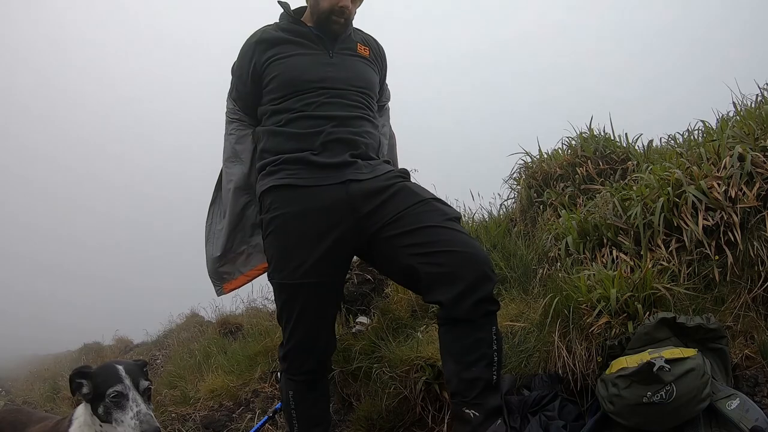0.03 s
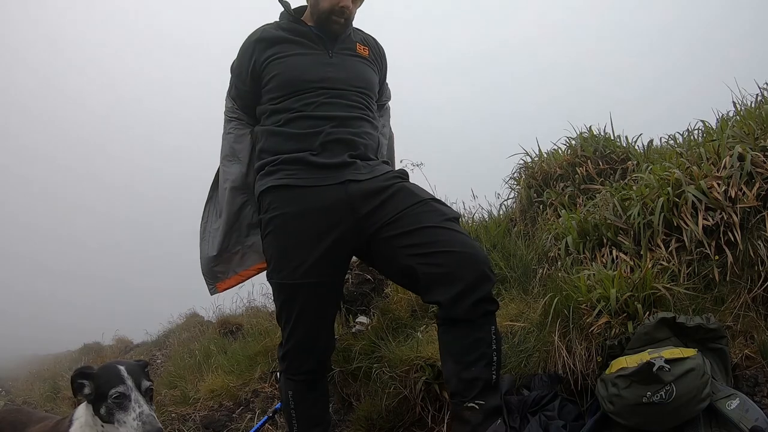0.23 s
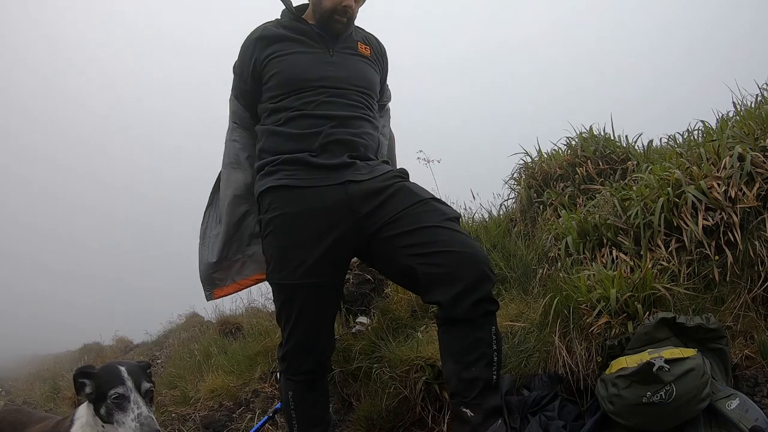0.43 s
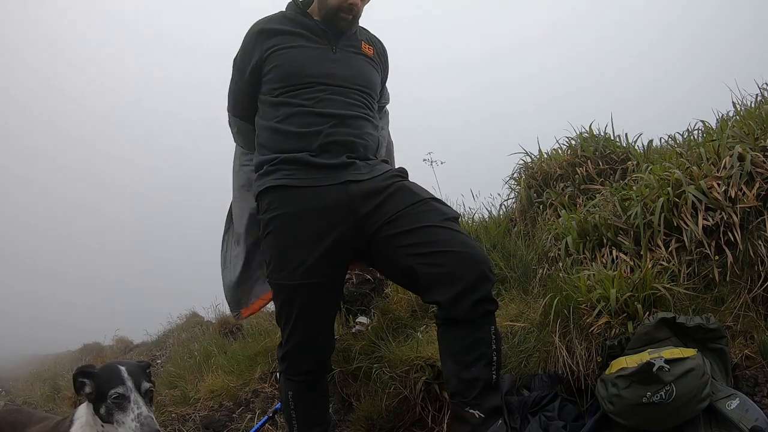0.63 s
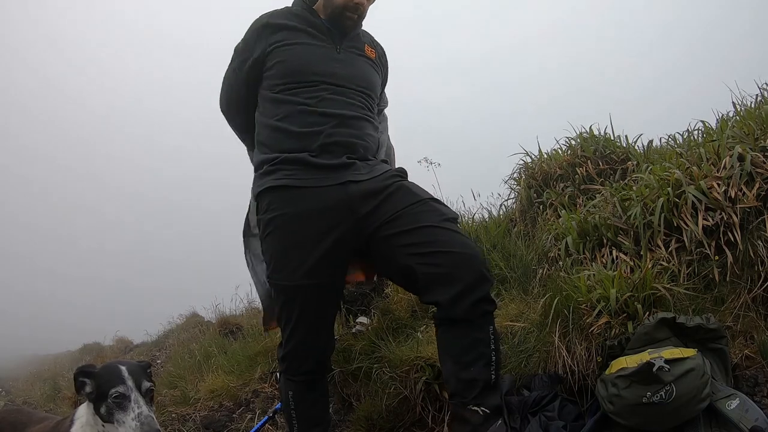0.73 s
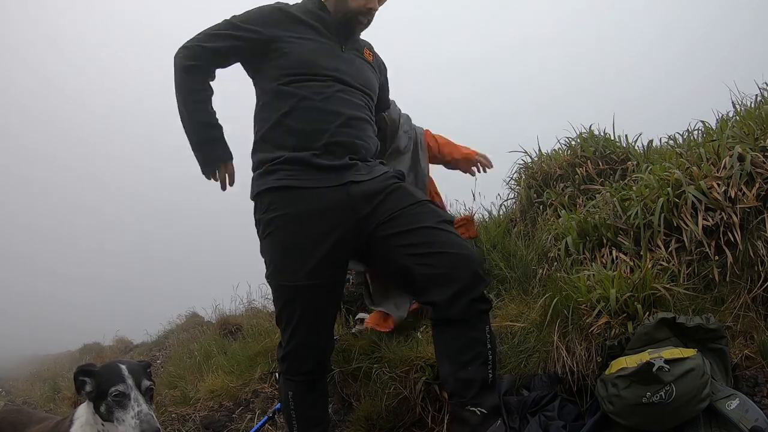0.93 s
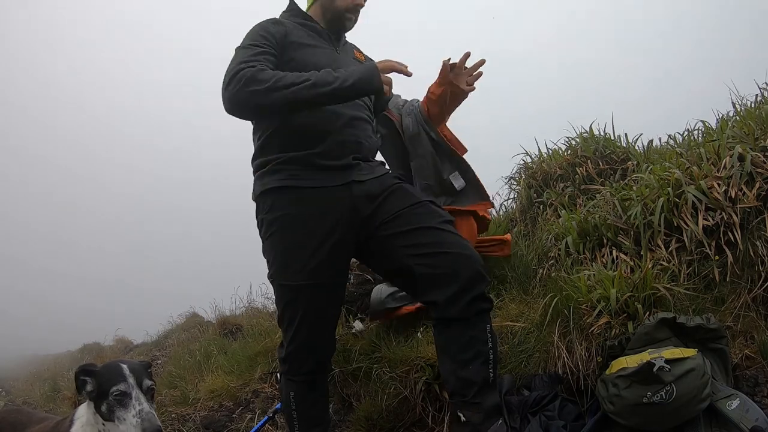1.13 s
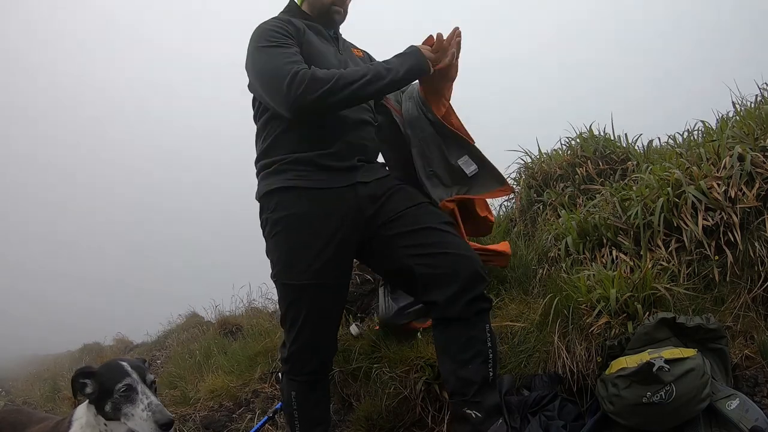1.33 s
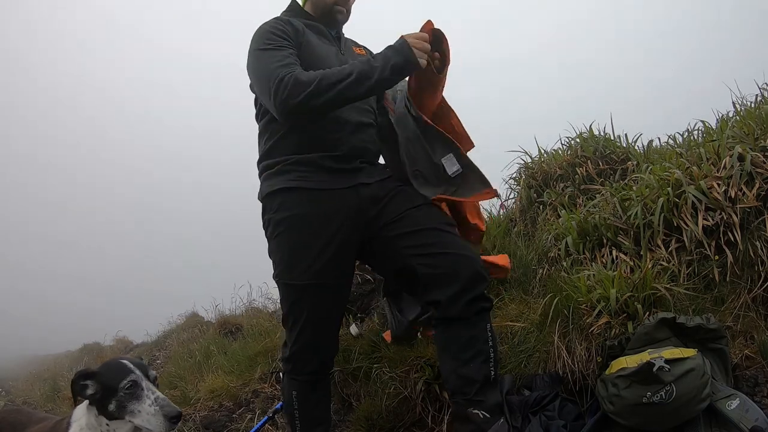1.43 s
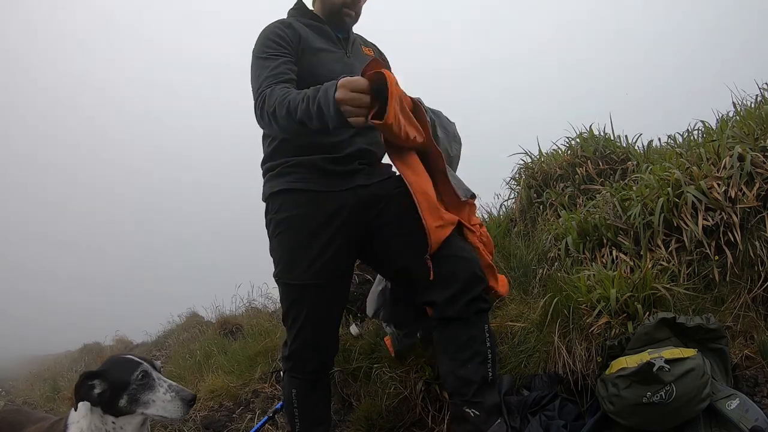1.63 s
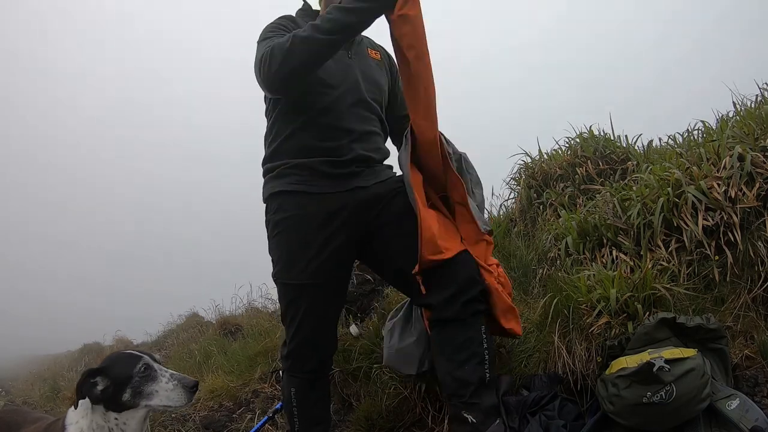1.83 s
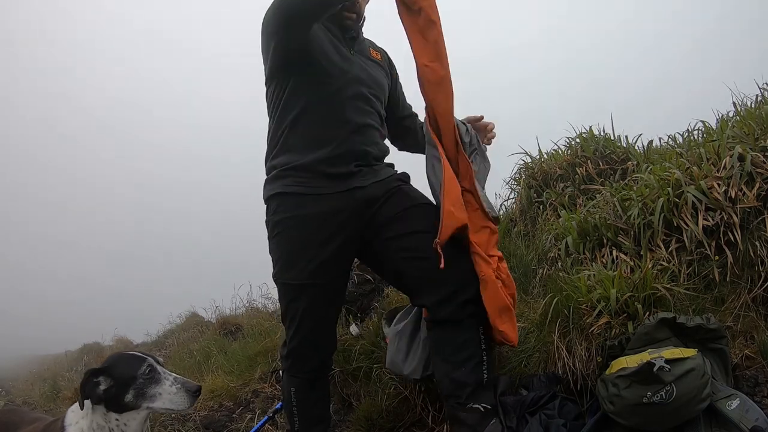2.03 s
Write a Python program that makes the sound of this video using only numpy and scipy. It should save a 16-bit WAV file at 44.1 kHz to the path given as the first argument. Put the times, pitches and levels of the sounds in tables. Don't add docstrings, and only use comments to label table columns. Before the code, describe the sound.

A light waterproof jacket rustles faintly as its sleeves slide off, snaps sharply as the cuff comes free, then swishes brightly as it is hauled up; wind thumps a small stereo microphone a couple of metres away.

```python
import sys
import numpy as np
from scipy import signal
from scipy.io import wavfile
from scipy.ndimage import uniform_filter1d

SR = 44100
rng = np.random.default_rng(int(sys.argv[2]) if len(sys.argv) > 2 else 0)


def transcribe(signal):
    frames = np.atleast_2d(signal).T
    limited = np.clip(frames, -1, 1)
    pcm = np.round(limited * 32767).astype(np.int16)
    wavfile.write(sys.argv[1], SR, pcm)


def rack_gain(trim_db):
    fader = np.asarray(trim_db, float)
    return 10 ** (fader / 20)


N = 91992


def rms_one(x):
    return x / np.sqrt(np.mean(x ** 2) + 1e-20)


def in_time(rows):
    start_s, *columns = np.transpose(rows)
    return [np.interp(np.arange(N) / SR, start_s, column) for column in columns]


def at_hz(points, hz):
    table_hz, values = np.transpose(points)
    return np.interp(np.log(hz), np.log(table_hz), values)


def band_pass(order, edges_hz, x):
    return signal.sosfilt(signal.butter(order, edges_hz, "band", fs=SR, output="sos"), x)


def low_pass(order, top_hz, x):
    return signal.sosfilt(signal.butter(order, top_hz, fs=SR, output="sos"), x)


def drift(rate_hz):
    r = np.exp(-80 * np.pi * rate_hz / SR)
    noise = rng.standard_normal(N // 40 + 2002)
    slow = signal.lfilter([1], [1, -2 * r, r * r], noise)[2000:]
    return np.interp(np.arange(N) / 40, np.arange(len(slow)), rms_one(slow - slow.mean()))


def ring(clicks, hz, t60_s):
    r, w = rack_gain(-60 / (t60_s * SR)), 2 * np.pi * hz / SR
    return signal.lfilter([0, np.sin(w)], [1, -2 * r * np.cos(w), r * r], clicks + 1e-18)


def grains(per_s, spread_db):
    size_db = spread_db * np.minimum(rng.exponential(1, N), 5)
    sizes = rack_gain(size_db) * rng.choice([-1, 1], N)
    return sizes * (rng.random(N) < per_s / SR)


# pitch_hz, likeness (1 = the same)
LIKENESS = [(250, .7), (1000, .75), (3000, .93), (5500, .72), (7800, .65), (9000, .2), (10500, .65),
            (12500, .88)]
TOP_BEND = 0.42


def colour(sources, spectrum, patchy_db, tilt_db=(0, 0), spread_db=0):
    out, together = 0, drift(14)
    edges = 200 * 2 ** (np.arange(20) / 3)
    crispness, thinness = tilt_db
    for k, (low, high) in enumerate(zip(edges, edges[1:])):
        mid, side = band_pass(2, [low, high], sources[k % 2])
        hz = np.sqrt(low * high)
        octaves = np.log2(hz / 4000)
        if octaves > 0:
            tilt = crispness * octaves * (1 + TOP_BEND * octaves)
        else:
            tilt = thinness * octaves
        flicker_db = patchy_db * (together + 0.93 * drift(4.0))
        gain = rack_gain(at_hz(spectrum, hz) + tilt + flicker_db)
        alike = at_hz(LIKENESS, hz)
        centre = np.sqrt(1 + alike) * mid
        sides = np.sqrt(1 - alike) * rack_gain(spread_db) * side * [[1], [-1]]
        out = out + gain * (centre + sides)
    return out


CREASE_BAND_HZ = [400, 6700]


def soft(x):
    return band_pass(3, CREASE_BAND_HZ, x)


ECHO_S, ECHO_TOP_HZ, ECHO_DB = 0.00071, 2200, -12


def wide(x):
    late = np.interp(np.arange(N) - ECHO_S * SR, np.arange(N), x)
    return x + rack_gain(ECHO_DB) * low_pass(2, ECHO_TOP_HZ, late) * [[1], [-1]]


# start_s, level_db, crispness_db_per_octave, thinness_db_per_octave
PULLS = [
    [(0, -60, 3.5, -9), (.026, -83.5, -3, -8), (.11, -60, -4.5, -5.5), (.23, -70.5, -9, -4.5),
     (.38, -77, 1.5, -7), (.44, -63, -8.5, -4)],
    [(.485, -53, -8, -2), (.55, -52.5, -4.5, -3.5), (.60, -52, -4.5, -0.5), (.66, -51.5, -4.5, -1),
     (.69, -51, -7, -1.5), (.72, -51.5, -3.5, 0.5), (.775, -47, -4.5, 2.5), (.84, -57.5, -2, -4.5)],
    [(.87, -54.5, -3, -5.5), (.93, -57, 0.5, -6), (.96, -51, -2.5, -3), (.985, -46.5, -3, -2),
     (1.015, -49, 0, -2), (1.05, -46.5, 2, -4), (1.074, -36.5, -2.5, 2), (1.1, -50.5, 0, -3),
     (1.178, -50, -1, -2.5)],
]
HAULS = [
    [(1.21, -55.5, 0.5, 0), (1.26, -55, -0.5, 0.5), (1.36, -60.5, -3, -4), (1.39, -48.5, -0.5, 1),
     (1.416, -51.5, 2.5, 2.5), (1.43, -56.5, 1, 0)],
    [(1.46, -49.5, 1.5, -2), (1.51, -43, 4, -2), (1.54, -42.5, 3, -1), (1.62, -43, 3, 0),
     (1.69, -41.5, 3, -0.5), (1.74, -47, 1.5, -4), (1.77, -51.5, 0.5, -3.5), (1.8, -50, -0.5, -3)],
    [(1.83, -53, -1, -2.5), (1.87, -43, -0.5, -2), (1.9, -42.5, 1, -2.5), (1.95, -43.5, 1.5, -1),
     (1.985, -43.5, 0, 0), (2.015, -45, -0.5, -1.5), (2.03, -48.5, -1, -2.5), (2.086, -54, -3, -2)],
]
# pitch_hz, level_db (per Hz)
FABRIC = [(250, -9), (900, -7.5), (2200, -2), (3250, -5.5), (4700, -2), (7900, -10), (9000, -12.5),
          (15000, -31.5)]
# start_s, extra_width_db
SPREAD = [(0, 4.5), (.8, 3.5), (1.0, -0.5), (1.3, 2), (1.5, 0), (2.086, 1)]
# start_s, band_gain_db
TAUT = [(0, -12), (.7, -21), (.78, -2), (.88, -12), (.97, -3.5), (1.1, -6), (1.3, -10), (1.5, -14),
        (1.6, -1.5), (1.75, -6), (1.9, -3), (2.086, -3)]
TAUT_BAND_HZ = [2830, 3690]
SLIPS_PER_S, SLIP_SPREAD_DB, SLIDE_DB, SLIDE_PATCH_DB = 9000, 0.5, -1, 1.0
GRIP_DB, GRIPS_PER_S = 1.6, 160
CRACKLES_PER_S, CRACKLE_DB, CRACKLE_SPREAD_DB, CRACKLE_CYCLES = 600, -9, 2.2, 4.5


def sliding():
    level_db, *tilt_db = in_time(np.concatenate([*PULLS, *HAULS]))
    slips = np.array([[rms_one(grains(SLIPS_PER_S, SLIP_SPREAD_DB)) for _ in range(2)] for _ in range(2)])
    hiss = colour(slips, FABRIC, SLIDE_PATCH_DB, tilt_db, in_time(SPREAD)[0])
    hiss = hiss * rack_gain(GRIP_DB * drift(GRIPS_PER_S))
    hiss = hiss + rack_gain(in_time(TAUT)[0]) * band_pass(1, TAUT_BAND_HZ, hiss)
    pops = grains(CRACKLES_PER_S * rack_gain(2.9 * drift(19)), CRACKLE_SPREAD_DB)
    dealt = rng.integers(0, 12, N)
    crackle = 0
    for k, hz in enumerate(np.geomspace(1100, 4600, 12)):
        tone = ring(pops * (dealt == k), hz, CRACKLE_CYCLES / hz)
        crackle = crackle + tone * rack_gain(.5 * at_hz(FABRIC, hz))
    crackle = wide(rms_one(soft(crackle)))
    plain_level = np.sqrt(np.mean(colour(slips, FABRIC, 0) ** 2))
    return rack_gain(level_db) * (rack_gain(SLIDE_DB) * hiss / plain_level + rack_gain(CRACKLE_DB) * crackle)


# start_s, level_db, small_eddies_db
GUSTS = [
    [(0.0, -47, 11), (0.036, -40, -10.5), (0.126, -35, 4), (0.256, -35.5, -10.5), (0.3, -37.5, -1),
     (0.33, -42, 4)],
    [(0.345, -51.5, 1), (0.385, -36, -10), (0.44, -38.5, -14), (0.475, -50.5, -10), (0.514, -64, 2),
     (0.54, -75, -10), (0.6, -62, -21)],
    [(0.6, -59, -23), (0.658, -57, -29), (0.682, -45.5, -27), (0.718, -40, -25), (0.83, -95, -15)],
    [(0.83, -73, -6), (0.874, -44.5, -7.5), (0.896, -32, -13.5), (0.992, -55, -13), (1.0, -37.5, -15)],
    [(1.0, -47, -16), (1.038, -43, -20), (1.06, -40.5, -15), (1.09, -42, -1), (1.13, -41, -5),
     (1.18, -47, -8.5), (1.27, -61, -14), (1.3, -50.5, -2)],
    [(1.31, -51, -8), (1.36, -43, -9), (1.39, -49, -7), (1.43, -34.5, -12), (1.48, -45.5, -5.5),
     (1.556, -54.5, -12), (1.596, -60, -24), (1.62, -78, -19)],
    [(1.62, -72, -26), (1.688, -66, -11), (1.722, -57, -16), (1.824, -57, -13), (1.95, -59.5, -5)],
    [(1.95, -73, 4), (1.972, -56.5, -2), (2.02, -34.5, 2.5), (2.054, -36.5, -8.5), (2.086, -41, -10)],
]
EDDY_HZ, EDDY_FOLLOWS = 80.3, 0.49
EDDY_FALL_DB, EDDY_RISE_DB = 11, 4.0
EDDY_LUMP_DB, WIND_DB, WIND_TOP_HZ = 3.0, 7.5, 197
WIND_SHARED, WIND_RIGHT_DB = .35, -9.0


def wind():
    level_db, size_db = in_time(np.concatenate(GUSTS))
    eddy_hz = EDDY_HZ * rack_gain(EDDY_FOLLOWS * size_db)
    white = rng.standard_normal((2, 3, N + SR))
    edges = 18 * 2 ** (np.arange(9) / 2)
    out, power = 0, 0
    for k, (low, high) in enumerate(zip(edges, edges[1:])):
        band = band_pass(2, [low, high], white[k % 2])[:, SR:]
        octaves = np.log2(np.sqrt(low * high) / eddy_hz)
        gain = rack_gain(np.where(octaves > 0, -EDDY_FALL_DB * octaves, EDDY_RISE_DB * octaves))
        power = power + gain ** 2
        out = out + rms_one(band) * gain * rack_gain(EDDY_LUMP_DB * drift(24.6))
    ports = np.sqrt(WIND_SHARED) * out[0] + np.sqrt(1 - WIND_SHARED) * out[1:]
    ports = ports / np.sqrt(power)
    ports = ports / np.sqrt(uniform_filter1d(ports ** 2, size=2600) + 0.033)
    ports = ports * rack_gain(level_db + WIND_DB) * [[1], [rack_gain(WIND_RIGHT_DB)]]
    return low_pass(6, WIND_TOP_HZ, ports)


# pitch_hz, level_db (per Hz)
AIR = [(200, -24), (300, -8.5), (800, -10), (1350, -0.5), (2300, -11), (8200, -26), (10300, -27),
       (12000, -50)]
AIR_DB, AIR_PATCH_DB, AIR_SPREAD_DB = -62.5, 1.0, 8
HUM_HZ, HUM_WIDTH_HZ, HUM_DB = 185, 79, -60


def hillside():
    hiss = rms_one(colour(rng.standard_normal((2, 2, N)), AIR, AIR_PATCH_DB, spread_db=AIR_SPREAD_DB))
    edges_hz = [HUM_HZ - HUM_WIDTH_HZ / 2, HUM_HZ + HUM_WIDTH_HZ / 2]
    shared, own = band_pass(2, edges_hz, rng.standard_normal((2, N)))
    hum = rms_one(shared + 0.2 * own * [[1], [-1]])
    return rack_gain(AIR_DB) * hiss + rack_gain(HUM_DB) * hum


# start_s, peak_db, pitch_hz, ring_cycles
SNAPS = [(0.067, -43, 1170, 7.6), (0.09, -40.5, 525, 4.6), (0.409, -42, 1560, 6.6), (0.451, -49.5, 1230, 6),
         (0.47, -48, 2390, 4), (0.724, -39.5, 1840, 12), (0.858, -41.5, 1250, 4.4), (0.865, -45, 2600, 3.7),
         (0.878, -41, 1030, 3.4), (0.912, -39.5, 1690, 4.6), (0.947, -40, 2100, 10), (0.965, -48, 3350, 9),
         (0.985, -39, 2600, 3.2), (1.028, -35, 2380, 9.3), (1.038, -40, 3000, 6), (1.047, -33, 3600, 5),
         (1.064, -31.5, 2930, 9.5), (1.0717, -19, 3100, 6), (1.075, -33, 3360, 5.4),
         (1.081, -32, 3050, 5.4), (1.254, -36.5, 1580, 12.5), (1.367, -34.5, 1420, 5.1),
         (1.368, -38, 3220, 4.4), (1.384, -38, 2350, 9.1), (1.413, -39, 2490, 4), (1.477, -39.5, 1900, 5),
         (1.492, -35, 2870, 10), (1.51, -36, 2400, 6), (1.515, -26.5, 2550, 11), (1.518, -41, 2780, 9.5),
         (1.723, -31, 1280, 5.1), (1.723, -31.5, 1480, 15), (1.728, -29, 3000, 8), (1.753, -35, 2500, 3.8),
         (1.785, -40, 1200, 4), (1.81, -32, 2460, 3.5), (1.842, -36, 2600, 3.6), (1.847, -36.5, 2470, 6),
         (1.855, -36, 1140, 6.4), (1.856, -39, 3600, 5.8), (1.864, -43, 1390, 7.9), (1.881, -24, 2100, 2.7),
         (1.89, -34, 2920, 9.8), (1.912, -38, 1460, 4.4), (1.932, -37.5, 1200, 7), (1.987, -25, 2010, 1.5),
         (2.014, -33, 1300, 5.1), (2.017, -36, 2780, 4)]
SNAP_BODY_DB, SNAP_BODY_S = -15, .003
SNAP_OVERTONE, SNAP_OVERTONE_DB = 1.68, -11.5
SNAP_LAG_S = .0006


def snaps():
    out, t = np.zeros(N + 2000), np.arange(1500) / SR
    flutter = rng.standard_normal((len(SNAPS), 1500))
    for (start_s, db, hz, cycles), noise in zip(SNAPS, flutter):
        t60_s = np.clip(cycles, 2, 20) / hz
        tone = np.sin(2 * np.pi * hz * t)
        if hz < 2000:
            tone = tone + rack_gain(SNAP_OVERTONE_DB) * np.sin(2 * np.pi * SNAP_OVERTONE * hz * t)
        click = tone * rack_gain(-60 * t / t60_s) * np.minimum(t / t60_s * 7, 1)
        tail = rms_one(ring(noise, hz, 5 / hz)) * np.exp(-t / SNAP_BODY_S) * rack_gain(SNAP_BODY_DB)
        i = int((start_s + SNAP_LAG_S) * SR)
        out[i:i + 1500] += rack_gain(db) * (click / click.max() + tail)
    return out[:N]


# start_s, peak_db, pitch_hz
FLAPS = [(0.092, -59, 477), (.675, -61.5, 794), (0.886, -45, 305), (0.914, -35.5, 258), (1.072, -43, 380),
         (1.255, -51, 352), (1.416, -49.5, 660), (1.487, -46, 322), (1.883, -44, 600), (1.933, -44.5, 224),
         (2.022, -45.5, 435)]
FLAP_RISE_S, FLAP_FALL_S, FLAP_CYCLES = 0.0028, 0.009, 4.8


def flaps():
    out, t = np.zeros(N + 4000), np.arange(3000) / SR
    shape = (1 - np.exp(-t / FLAP_RISE_S)) * np.exp(-t / FLAP_FALL_S)
    for (start_s, db, hz), noise in zip(FLAPS, rng.standard_normal((len(FLAPS), 3000))):
        t60_s = FLAP_CYCLES / hz
        puff = ring(ring(noise, hz, t60_s), hz, t60_s)
        i = int(start_s * SR)
        out[i:i + 3000] += rack_gain(db) * rms_one(puff) * shape
    return out[:N]


def scene():
    fabric = sliding()
    creases = wide(soft(snaps()) + flaps())
    return fabric + creases + wind() + hillside()


def peak(x, hz, width_hz, db):
    a, w = rack_gain(db / 2), 2 * np.pi * hz / SR
    q = np.sin(w) * width_hz / hz / 2
    top = [1 + q * a, -2 * np.cos(w), 1 - q * a]
    bottom = [1 + q / a, -2 * np.cos(w), 1 - q / a]
    return signal.lfilter(top, bottom, x)


# pitch_hz, width_hz, gain_db
PORT = [(3250, 900, 3.5), (4600, 1100, -4.0), (7600, 1500, 3.0), (8700, 900, -3.5)]


def port_colour(x):
    for hz, width_hz, db in PORT:
        x = peak(x, hz, width_hz, db)
    return x


def roll_off(x):
    return signal.sosfilt(signal.butter(12, 15600, fs=SR, output="sos"), x)


def record(dry):
    x = port_colour(dry)
    x = signal.sosfilt(signal.cheby2(10, 60, 16300, fs=SR, output="sos"), x)
    return roll_off(x)


dry = scene()
out = record(dry)
transcribe(out)
```